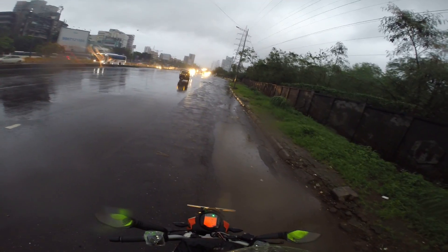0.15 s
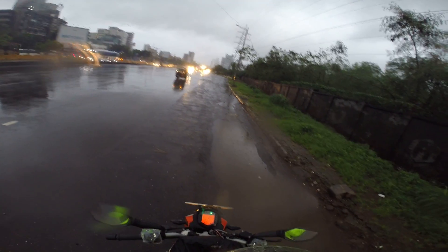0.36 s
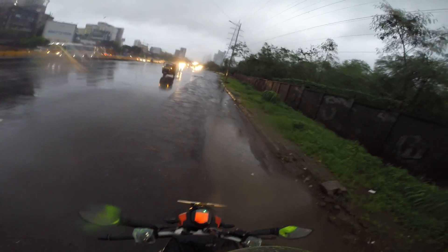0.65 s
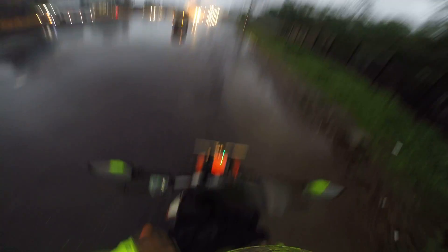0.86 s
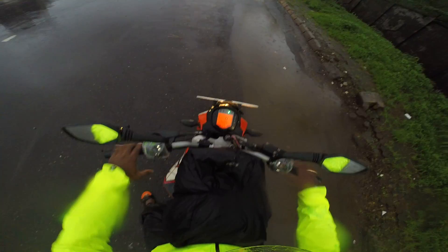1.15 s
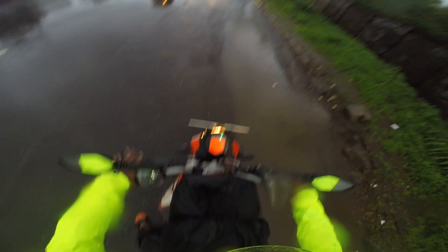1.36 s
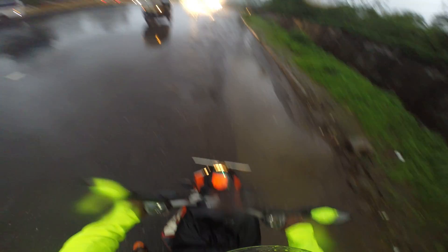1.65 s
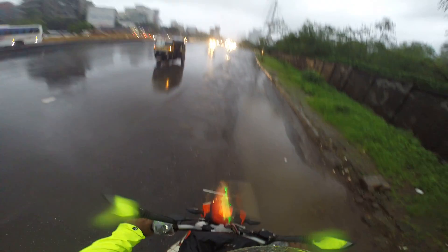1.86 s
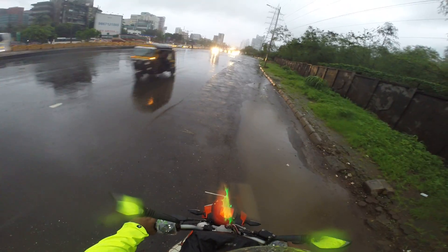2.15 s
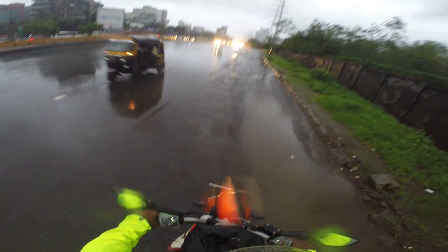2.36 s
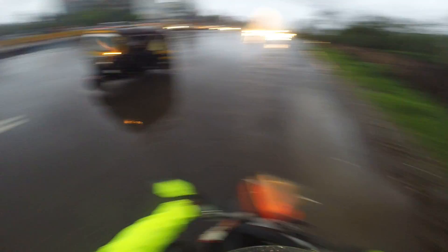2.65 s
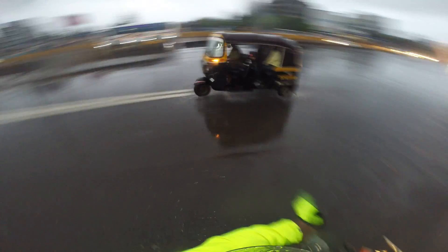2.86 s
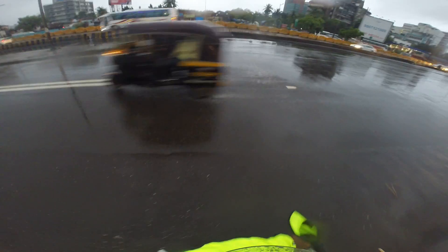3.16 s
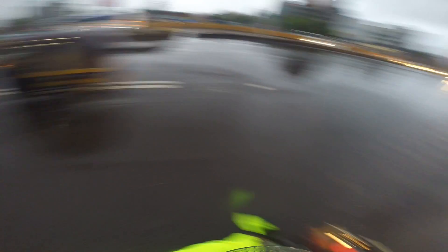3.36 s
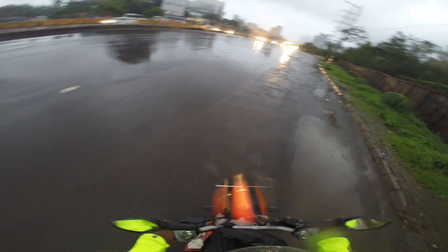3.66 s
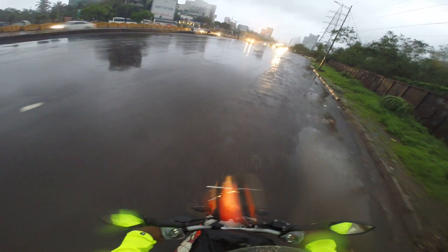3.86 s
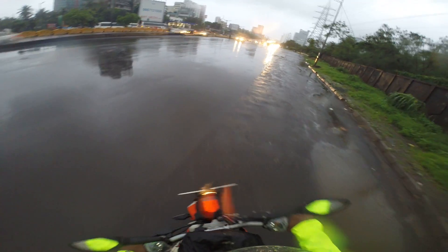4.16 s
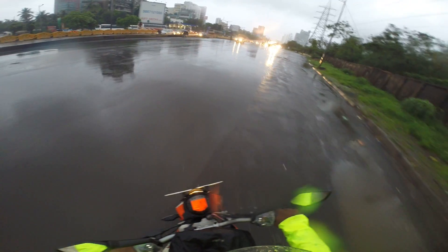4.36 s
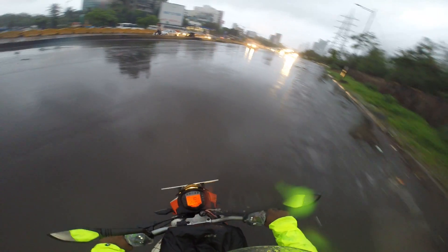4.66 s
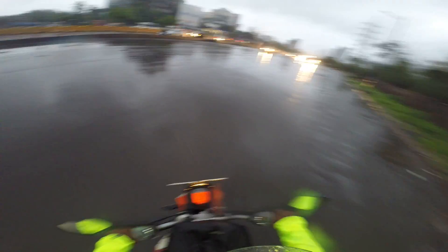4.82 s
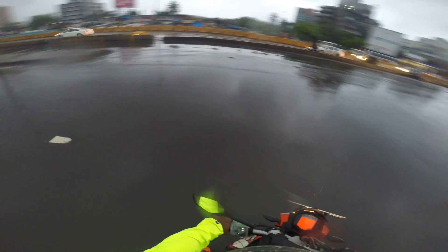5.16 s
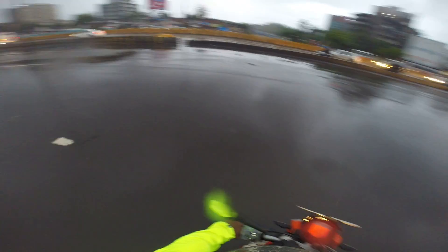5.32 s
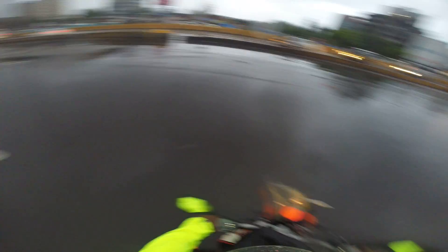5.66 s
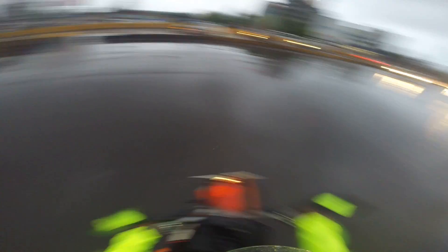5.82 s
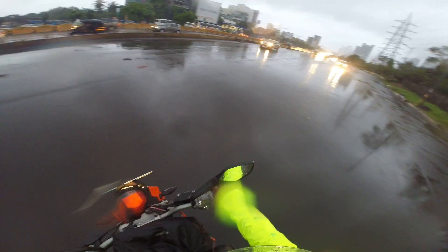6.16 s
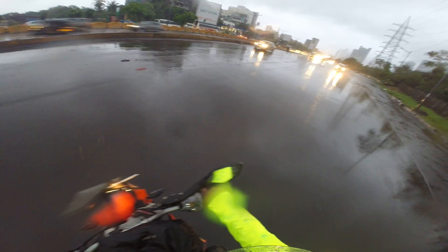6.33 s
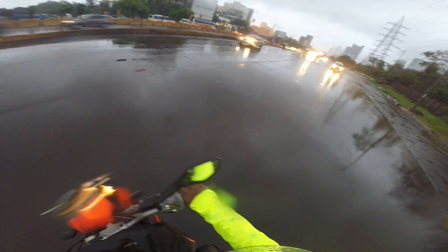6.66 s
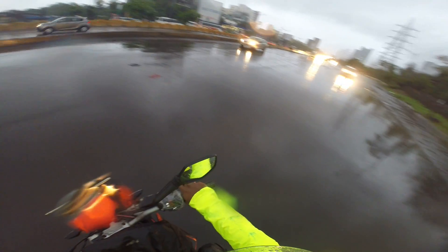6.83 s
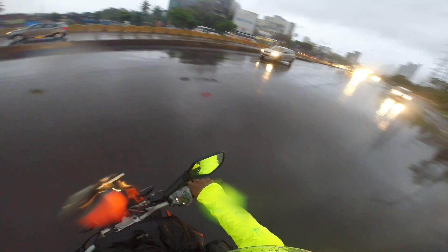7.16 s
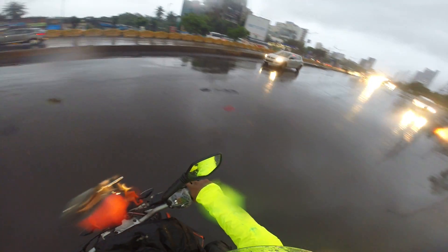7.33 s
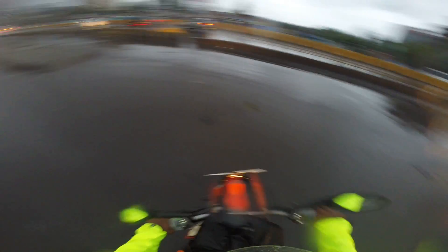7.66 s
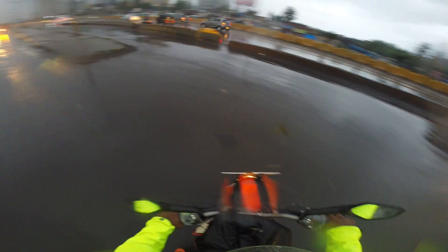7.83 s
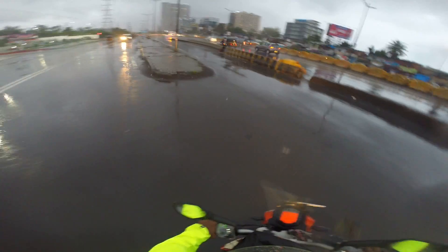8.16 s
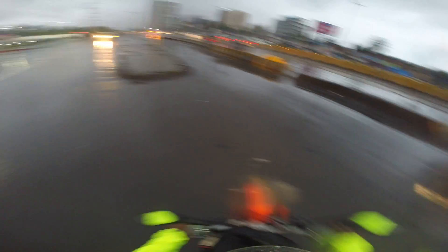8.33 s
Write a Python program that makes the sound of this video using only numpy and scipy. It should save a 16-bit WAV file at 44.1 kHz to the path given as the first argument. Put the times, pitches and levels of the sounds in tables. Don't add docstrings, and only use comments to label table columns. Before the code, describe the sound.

A microphone in a sealed case on a motorbike rider's helmet hears constant boxy rain hiss. From 0 to 0.8 s, deep thuds sway the mount, strongest around 0.5 and 0.77 s, with a loose door chattering at 0.6 s and a rubbing strap. Beneath, a single-cylinder engine idles faintly at about twelve thumps per second. It blips at 1.5 and 2.3 s, then pulls away from 2.6 s as a passing three-wheeler's spray swells loudly around 2.9 s. More pulls follow until 5 s; revs sink to near idle around 6 s, then climb into a steady pull from 6.4 s to the end. Drops tick throughout, with hard taps at 0.47, 3.97, 5.4, 7.3 and, loudest, 7.63 s. A faint, high two-tone horn beeps twice at 5.4-5.65 s. Spray swells again near 7.85 and 8.5 s, over low wind buffeting and traffic drone.

```python
import sys
import numpy as np
from scipy import signal
from scipy.fft import rfft, irfft, next_fast_len
from scipy.io import wavfile
from scipy.ndimage import uniform_filter1d

SR = 44100
rng = np.random.default_rng(int(sys.argv[2]) if len(sys.argv) > 2 else 0)


def convert_level_to_amplitude(level_db):
    exponent = np.asarray(level_db, float) / 20
    return 10 ** exponent


def master_out(mix):
    frames = np.transpose(np.atleast_2d(mix))
    ceiling = np.clip(frames, -1, 1)
    pcm = np.round(ceiling * 32767).astype(np.int16)
    wavfile.write(sys.argv[1], SR, pcm)


N = 374409
T = np.arange(N) / SR
SIZE = next_fast_len(N)
HZ = np.arange(SIZE // 2 + 1) * SR / SIZE + 1


def unit(x):
    return x / np.sqrt(np.mean(x ** 2))


def curves(table):
    s, *columns = np.transpose(table)
    return [np.interp(T, s, column) for column in columns]


def colour(points):
    hz, db = np.transpose(points)
    return convert_level_to_amplitude(np.interp(np.log(HZ), np.log(hz), db, left=-90, right=-90))


def band(lo_hz, hi_hz):
    return 1 / np.sqrt((1 + (lo_hz / HZ) ** 30) * (1 + (HZ / hi_hz) ** 30))


def noise(gain, source=None):
    source = rfft(rng.standard_normal(SIZE)) if source is None else source
    return irfft(source * gain, SIZE)[:N]


def walk(rate):
    hold_ms = int(1000 / rate)
    held = np.repeat(rng.standard_normal(800), hold_ms)[:9000]
    slewed = uniform_filter1d(uniform_filter1d(held, hold_ms), hold_ms)
    return np.interp(T * 1000, np.arange(len(held)), unit(slewed))


def ring(hz, t60, rise, phase=0., length=.04):
    t = np.arange(int(length * SR)) / SR
    decay = np.exp(-np.log(1000) * t / t60)
    return np.sin(2 * np.pi * hz * t + phase) * decay * (1 - np.exp(-t / rise))


def add(out, s, x):
    i = int(s * SR)
    out[i:i + len(x)] += x[:max(len(out) - i, 0)]


def total_db(levels):
    return 20 * np.log10(np.sqrt(sum(convert_level_to_amplitude(2 * db) for db in levels)))


# centre_hz, width_hz, level_db
EXHAUST_MODES = [(40, 31, -8.5), (158, 48, 0), (400, 130, -3.5)]
# time_s, firing_rate_hz
FIRING_RATE = [(0, 12), (2.36, 12), (2.77, 23.4), (3.56, 29.6), (3.76, 28.7), (4.0, 33.2), (4.42, 26.6),
               (4.62, 26.5), (4.96, 30.5), (5.11, 28.4), (5.8, 15), (6.15, 14.5), (6.75, 27.1), (7.3, 24.2),
               (7.6, 29.8), (7.97, 29.6), (8.25, 31.1), (8.49, 30.3)]


def engine():
    (hz,), db = curves(FIRING_RATE), throttle()
    unevenness = np.interp(hz, [14, 24], [.04, .004])
    turns = np.cumsum(hz * (1 + unevenness * walk(20))) / SR
    fired = np.flatnonzero(np.diff(np.floor(turns)))
    pulses = np.zeros(N)
    pulses[fired] = convert_level_to_amplitude(1.2 * rng.standard_normal(400)[:len(fired)]) / np.sqrt(hz[fired])
    body = sum((-1) ** k * convert_level_to_amplitude(level_db) * ring(mode_hz, 2.6 / width, .7 / width, length=.15)
               for k, (mode_hz, width, level_db) in enumerate(EXHAUST_MODES))
    thump = unit(signal.fftconvolve(pulses, body)[:N])
    gas = np.exp(-(turns % 1) / 0.16) * noise(band(1540, 1880))
    return convert_level_to_amplitude(db - 2.0) * thump + convert_level_to_amplitude(0.59 * db - 31) * unit(gas)


IDLE_DB, TWIST_S = -60, 0.12
# start_s, end_s, exhaust_db
THROTTLE_PULLS = [
    (1.497, 1.902, -59),
    (2.246, 2.44, -60),
    (2.582, 3.43, -50.5),
    (3.49, 3.97, -50.5),
    (4.05, 4.5, -53.5),
    (4.47, 5.057, -51.5),
    (5.05, 6.1, -63),
    (5.85, 5.95, -54),
    (6.336, 8.6, -52),
]


def throttle():
    levels = [IDLE_DB]
    for start, end, db in THROTTLE_PULLS:
        held = np.clip(np.minimum(T - start, end - T) / TWIST_S + .5, 1e-4, 1)
        levels.append(db + 20 * np.log10(held))
    return total_db(levels)


# frequency_hz, density_db (per hz)
HISS_COLOUR = [(530, -39), (900, -4), (1130, -16), (1370, 3.5), (1750, 4), (2050, -0.5), (2720, 4),
               (3540, -7), (3850, -13), (5910, -12.5), (6900, -13), (7500, -14.5), (8440, -17),
               (11600, -25), (15500, -37.5)]
# centre_hz, width_hz, lift_db
CAVITY_MODES = [(1736, 230, 7.5), (2266, 98, 5.5), (2800, 28, 4), (3516, 130, -9.5), (3910, 760, 5.5),
                (5020, 290, -2.5), (5480, 660, 4), (6410, 620, 2), (7500, 280, 7), (8970, 430, 2),
                (10400, 400, 2)]
# rain_db, spray_share_db, cavity_share (ratio), port_share (ratio)
CASE_RANGES = [(-50.5, 12, 0.71, 0.11), (-50.5, 3.5, 0.16, 0.16), (-57.5, 1.5, 0, 0.14),
               (-55.5, -2, 0, 0.24), (-61.5, -16.5, 0.11, 1), (-67.5, -8.5, 0, 0.24), (-70, -9, 0, .6)]


def wet_road():
    lift_db = sum(lift / (1 + (2 * (HZ - hz) / width) ** 2) for hz, width, lift in CAVITY_MODES)
    case = colour(HISS_COLOUR) * convert_level_to_amplitude(lift_db)
    landed = rng.random(SIZE) < 200 / SR
    patter = landed * convert_level_to_amplitude(5.6 * rng.exponential(size=SIZE)) * rng.standard_normal(SIZE)
    patter = convert_level_to_amplitude(-14.5) * rfft(unit(np.clip(patter, -7, 7))) / np.sqrt(1 + (HZ / 3500) ** 4)
    source = case * (rfft(rng.standard_normal(SIZE)) + patter)
    edges = [600, 2050, 3500, 5000, 6900, 8100, 11000, 15400]
    swell_db, out = .25 * walk(3), 0
    for lo, hi, row in zip(edges, edges[1:], CASE_RANGES):
        mid = np.sqrt(lo * hi)
        low = convert_level_to_amplitude(.8 * walk(3)) * noise(band(lo, mid), source)
        high = convert_level_to_amplitude(.8 * walk(3)) * noise(band(mid, hi), source)
        low_gain = convert_level_to_amplitude(wetness(np.sqrt(lo * mid), *row))
        high_gain = convert_level_to_amplitude(wetness(np.sqrt(mid * hi), *row))
        part = low_gain * low + high_gain * high
        out = out + convert_level_to_amplitude(-1.5 + swell_db + 1.06 * walk(14)) * part / np.std(low + high)
    return out


SPRAY_FALL = 16.8
SPRAY_NARROW_DB = 13
# closest_s, distance_over_speed_s, peak_db, loudest_hz
SPRAY_PASSES = [
    (1.6, 0.51, -66, 6000),
    (2.6, 0.5, -49, 4250),
    (2.94, 0.23, -41.5, 5300),
    (3.27, 0.2, -45.5, 5600),
    (5.7, 0.56, -54, 7500),
    (7.1, 0.97, -53.5, 4470),
    (7.85, 0.36, -46, 6030),
    (8.5, 0.32, -46.5, 5900),
]
# time_s, level_db
CAVITY_EXPOSURE = [(0, 1.5), (.9, 2), (1.25, -2), (2.1, 2.5), (2.7, 6), (3.2, 2), (3.85, 5.5), (4.6, .5),
                   (4.9, 6), (5.18, -3.5), (5.84, -4), (6.2, 5), (6.7, -1.5), (7.4, 1), (7.7, -0.5),
                   (8.49, 1)]
# time_s, level_db
PORT_EXPOSURE = [(0, -2), (.4, -3.5), (.92, 1), (1.25, 2.5), (2.08, 5), (2.32, 0.5), (2.53, 4.5),
                 (2.75, -1), (3.4, 1.5), (3.85, 2), (4.6, 1), (4.9, -2), (5.3, 0), (5.84, 0), (6.6, 3.5),
                 (7.17, 8), (7.45, 5), (8.49, 3)]


def wetness(hz, rain_db, spray_db, cavity, port):
    levels = [rain_db]
    for s, lag, db, top_hz in SPRAY_PASSES:
        pitch_loss = SPRAY_NARROW_DB * np.abs(np.log2(hz / top_hz))
        distance_loss = SPRAY_FALL * np.log10(1 + ((T - s) / lag) ** 2)
        levels.append(db + spray_db - pitch_loss - distance_loss)
    return total_db(levels) + cavity * curves(CAVITY_EXPOSURE)[0] + port * curves(PORT_EXPOSURE)[0]


# start_s, peak_db, hollow_share_db, wall_share_db, crack_share_db
BIG_DROPS = [
    (0.4728, -12.5, -8.5, -7, -15.5),
    (3.9651, -8, -7.5, -5, -6),
    (5.395, -9.5, -3.5, -0.5, -4),
    (5.5773, -14.5, -7, -6, -11),
    (7.3048, -11, -6.5, -9, -18.5),
    (7.6263, -6, -10, -4, -19),
    (7.6319, -14.5, -13, -2, -4.5),
]
# start_s, peak_db, hollow_share_db
SMALL_DROPS = [(0.0428, -40.5, 8.5), (1.1368, -35, 4.5), (1.2853, -35, 0), (1.717, -30, -3),
               (2.039, -33, -4), (2.7812, -42, 13), (3.3123, -41, 6), (3.472, -36, -4), (3.9727, -29, -3),
               (4.185, -44, 14), (4.2376, -35, -5), (4.628, -31.5, 0), (4.683, -31.5, 3),
               (5.1519, -36.5, 9.5), (5.3794, -30, -2), (5.682, -43, 9), (5.797, -36.5, 4),
               (7.1974, -43, 14.5), (5.9456, -32, 7), (6.388, -38, 2), (6.511, -36, 11), (6.657, -29, -7),
               (6.733, -45.5, 15.5), (7.016, -40, 8), (7.082, -32, 0.5), (7.266, -31, -2), (7.6175, -36, 9),
               (7.734, -32.5, 5), (7.8986, -27.5, -3.5), (8.198, -30, -1)]
DRIP_WALL_DB, DRIP_CRACK_DB = -5, -19
# mode_hz, t60_s, level_db
SHELL_MODES = [(2540, 0.014, 3), (2870, 0.01, -2), (3260, 0.013, -3)]
# mode_hz, t60_s, level_db
HOLLOW_MODES = [(1200, 0.0071, -17.5), (1510, 0.016, 1.5), (1748, 0.011, 6), (1990, 0.012, 1)]
# mode_hz, t60_s, level_db
WALL_MODES = [(3780, 0.0087, 1), (4390, 0.0045, 9), (4870, 0.0095, 0.5), (5530, 0.015, 2), (6470, 0.012, 2)]
# mode_hz, t60_s, level_db
CRACK_MODES = [(7900, 0.0037, -0.5), (9000, 0.0062, -4), (9740, 0.0039, -6), (12100, 0.0041, -10)]


def drops():
    out = np.zeros(N)
    # (modes, rise s, phase lag between modes rad)
    groups = [(SHELL_MODES, .0005, 1.7), (HOLLOW_MODES, .0005, .2), (WALL_MODES, .00012, .2),
              (CRACK_MODES, .00006, .2)]
    hits = BIG_DROPS + [(*drip, DRIP_WALL_DB, DRIP_CRACK_DB) for drip in SMALL_DROPS]
    for (s, db, *shares), chance in zip(hits, rng.standard_normal((len(hits), 4, 5, 3))):
        for (modes, rise, lag), group_db, draws in zip(groups, [0, *shares], chance):
            tick = 0
            for k, ((hz, t60, mode_db), (detune, spread, phase)) in enumerate(zip(modes, draws)):
                start_phase = np.pi - lag * k + .5 * phase
                tone = ring(hz * (1 + .012 * detune), t60, rise, start_phase)
                tick = tick + convert_level_to_amplitude(mode_db + 1.5 * spread) * tone
            add(out, s, convert_level_to_amplitude(db + group_db - 0.42) * tick / np.max(np.abs(tick)))
    return signal.sosfilt(signal.butter(3, 850, "high", fs=SR, output="sos"), out)


# start_s, peak_db, sway_hz, t60_s, frame_buzz_db
MOUNT_KNOCKS = [(0.0, -23.5, 40, 0.15, -43), (0.149, -29, 46.4, .3, -46), (.166, -15, 37.5, 0.45, -48),
                (0.23, -29, 62.5, 0.19, -43.5), (0.478, -2.5, 38.4, 0.36, -43), (.574, -5, 80, 0.09, -27),
                (0.609, -37, 63, 0.15, -25.5), (0.637, -6, 46.3, 0.1, -26), (0.687, -16.5, 45, 0.21, -37),
                (0.75, -20, 62.4, .4, -23.5), (.766, 0, 42.4, 0.065, -36), (.795, -11, 40.5, 0.39, -48),
                (2.72, -29, 40, 0.16, -45.5)]
# mode_hz, t60_s, level_db
FRAME_MODES = [(57.4, 0.73, 1.5), (204, 0.18, -8.5), (271, 0.18, -2), (307, 0.05, -6.5)]
# start_s, peak_db
DOOR_RATTLE = [
    (0.5636, -46),
    (0.603, -27),
    (0.616, -38),
    (0.6268, -26.5),
    (0.6346, -27.5),
    (0.6426, -20),
    (0.6551, -21),
    (0.6795, -30),
    (0.751, -32.5),
]
# mode_hz, t60_s, level_db
DOOR_MODES = [(567, 0.024, -11), (924, 0.056, -16.5), (1510, 0.014, 3.5), (1707, 0.029, 2.5),
              (2180, 0.018, -5)]
# start_s, peak_db
STRAP_JERKS = [(0, -34.5), (.2, -32.5), (.244, -39.5), (.352, -56), (.48, -36), (.582, -24), (.63, -29),
               (.75, -51), (.79, -31), (1.028, -47)]
JERK_RISE_S, JERK_T60_S = 0.013, 0.26


def knocks():
    out = np.zeros(N)
    ends = [knock[0] for knock in MOUNT_KNOCKS[1:]] + [N / SR]
    for (s, db, hz, t60, buzz_db), end in zip(MOUNT_KNOCKS, ends):
        sway = ring(hz, t60, 0.0053, np.pi, length=.6)
        overrun = np.maximum(np.arange(len(sway)) / SR - (end - s), 0)
        checked = np.exp(-overrun / 0.0045)
        add(out, s, convert_level_to_amplitude(db - 0.5) * sway * checked)
        buzz = sum(convert_level_to_amplitude(g) * ring(f, t, 0.0039, np.pi, length=.6) for f, t, g in FRAME_MODES)
        add(out, s, convert_level_to_amplitude(buzz_db) * buzz)
    rattle_phases = 2 * np.pi * rng.random((len(DOOR_RATTLE), len(DOOR_MODES)))
    for (s, db), phases in zip(DOOR_RATTLE, rattle_phases):
        add(out, s, sum(convert_level_to_amplitude(db + g - 2.5) * ring(f, t, 0.00064, p) for (f, t, g), p in zip(DOOR_MODES, phases)))
    rub_levels = []
    for s, db in STRAP_JERKS:
        fall_db = np.where(T < s, 20 * (s - T) / JERK_RISE_S, 60 * (T - s) / JERK_T60_S)
        rub_levels.append(db - fall_db)
    return out + convert_level_to_amplitude(total_db(rub_levels) - 2) * unit(noise(band(75, 158)))


# start_s, end_s, start_hz, end_hz, level_db
HORN_TONES = [
    (5.368, 5.452, 4095, 4040, -52.5),
    (5.424, 5.492, 3280, 3240, -52),
    (5.518, 5.655, 4055, 4000, -57.5),
    (5.522, 5.6, 3320, 3285, -49),
    (5.595, 5.66, 3290, 3275, -58),
]


def horn():
    out = np.zeros(N)
    for start, end, start_hz, end_hz, db in HORN_TONES:
        hz = np.linspace(start_hz, end_hz, int((end - start) * SR))
        tone = np.sin(2 * np.pi * np.cumsum(hz) / SR)
        add(out, start, convert_level_to_amplitude(db + 4.0) * signal.windows.tukey(len(hz), .25) * tone)
    return out * convert_level_to_amplitude(1.0 * walk(60))


CALM_DB = -50.5
DRONE_DB, DRONE_PER_LOAD = -56.5, 0.11
# middle_s, half_length_s, peak_db
WIND_GUSTS = [(0.504, 0.45, -37), (1.2, .12, -47), (1.9, 0.19, -45.5), (2.756, .06, -36.5),
              (2.954, .06, -48), (3.144, 0.077, -42), (3.605, 0.69, -46), (3.95, 0.052, -48),
              (4.195, 0.16, -50), (4.607, 0.087, -51), (4.946, .1, -50), (5.33, 0.053, -44),
              (5.9, 0.36, -51), (6.137, 0.12, -44), (6.42, .2, -50), (6.85, 0.15, -48.5),
              (7.305, 0.32, -51), (7.683, .12, -45), (8, 0.33, -46.5)]
# centre_hz, width_hz, level_db
MOUNT_MODES = [(8.04, 16, 0), (26.5, 4, -6), (40.8, 9.5, -1.5), (59, 2.6, 0)]
# frequency_hz, density_db (per hz)
TRAFFIC_COLOUR = [(50, -30), (90, -0.5), (150, -8), (270, -7), (360, -10.5), (670, -13), (1300, -15.5)]


def air():
    wind_db = total_db([CALM_DB] + [db - 6 * ((T - s) / half) ** 4 for s, half, db in WIND_GUSTS])
    drone_db = DRONE_DB + DRONE_PER_LOAD * (throttle() - IDLE_DB)
    mount_power = sum(convert_level_to_amplitude(2 * g) / (1 + (2 * (HZ - f) / w) ** 2) for f, w, g in MOUNT_MODES)
    mount = np.sqrt(mount_power / (1 + (HZ / 70) ** 4))
    wind = convert_level_to_amplitude(wind_db - 1.8 + 1.16 * walk(7.7)) * unit(noise(mount))
    drone = convert_level_to_amplitude(drone_db + 2.5 + 0.55 * walk(12)) * unit(noise(colour(TRAFFIC_COLOUR)))
    return wind + drone


def scene():
    return (engine() + wet_road() + drops() + knocks() + horn() + air())[None]


def top_cut(x):
    return signal.sosfilt(signal.butter(12, 16480, fs=SR, output="sos"), x)


def record(dry):
    mix = signal.sosfilt(signal.butter(8, 15800, fs=SR, output="sos"), dry)
    return top_cut(mix)


dry = scene()
out = record(dry)
master_out(out)
```